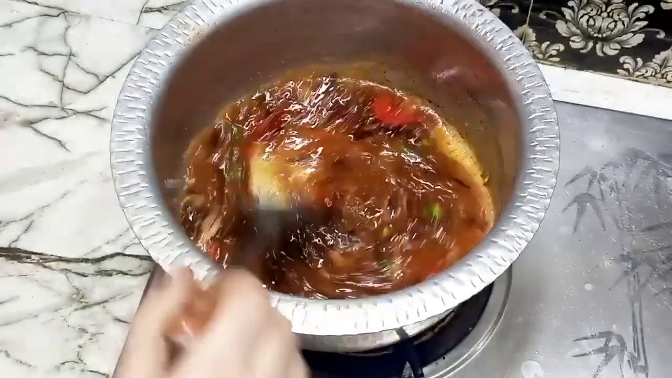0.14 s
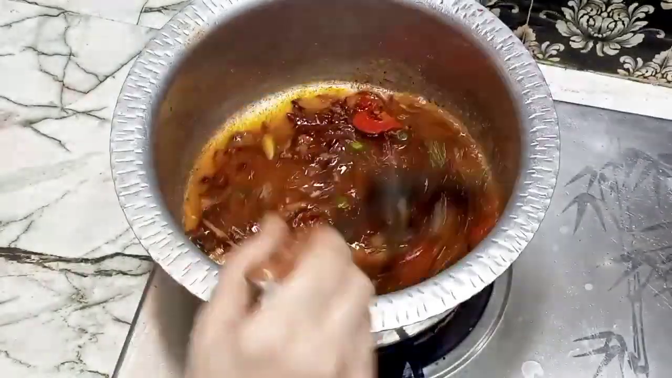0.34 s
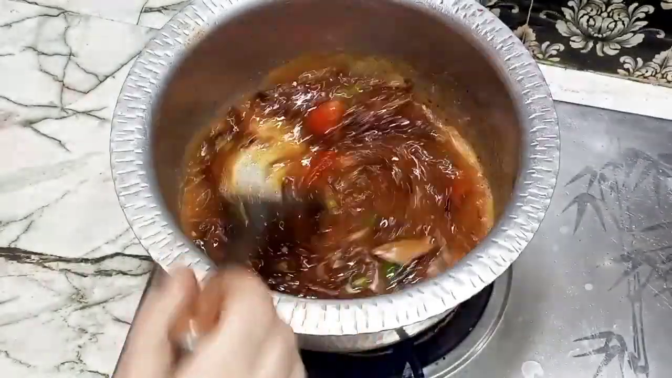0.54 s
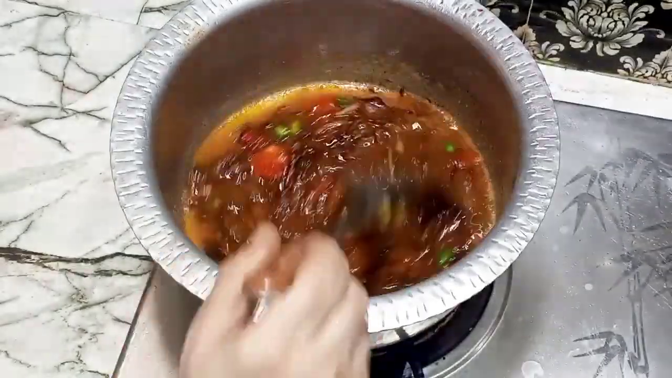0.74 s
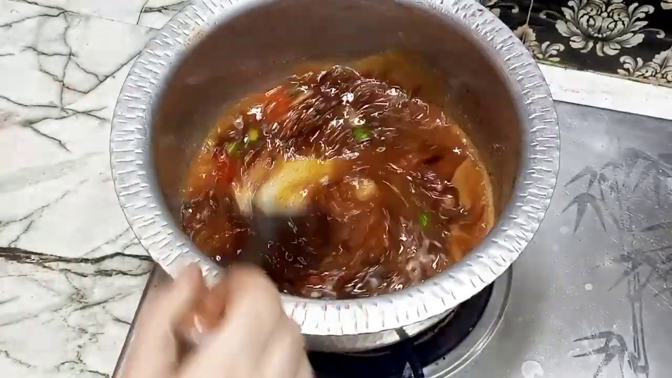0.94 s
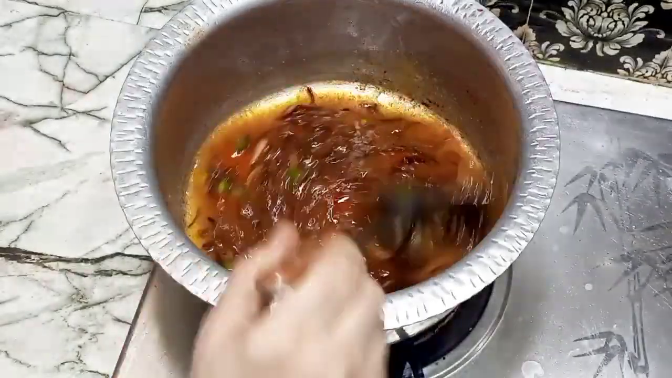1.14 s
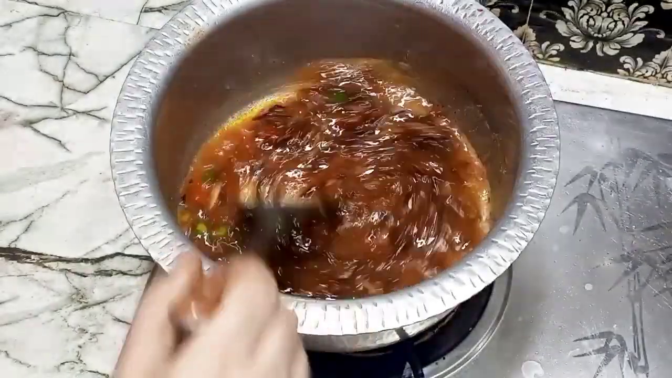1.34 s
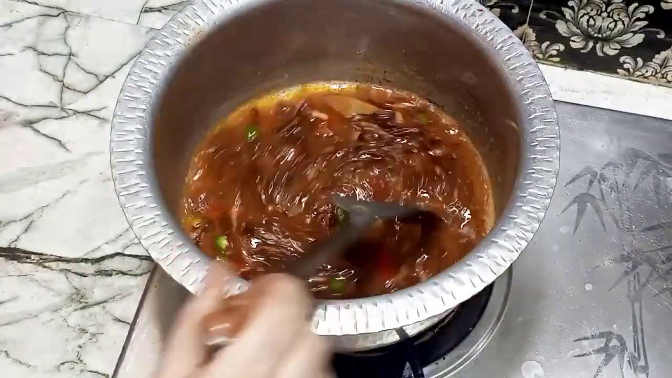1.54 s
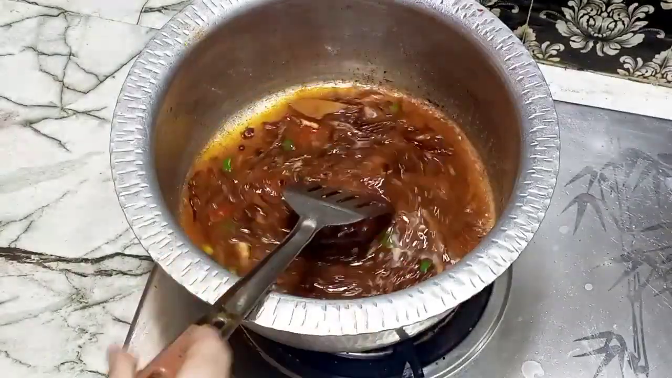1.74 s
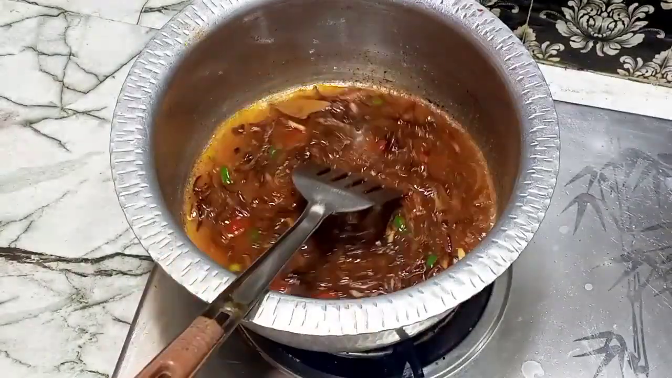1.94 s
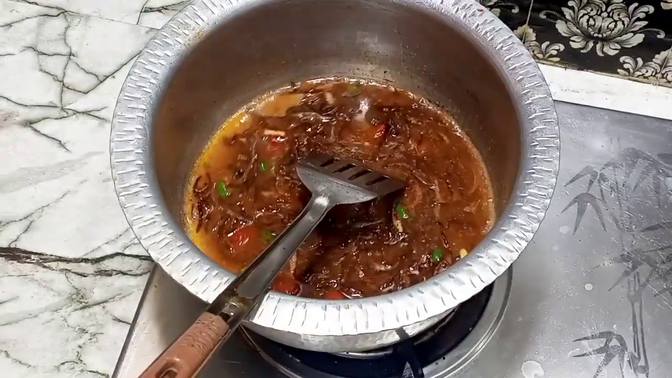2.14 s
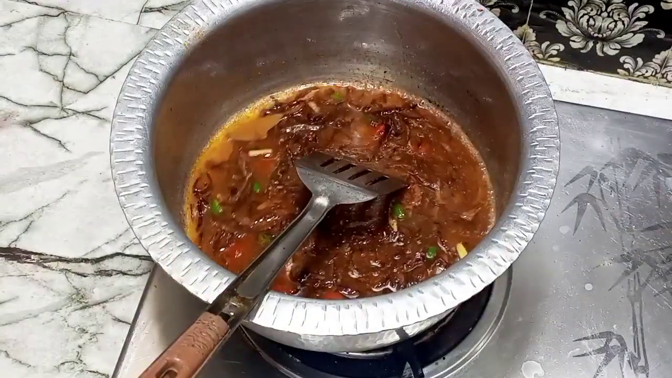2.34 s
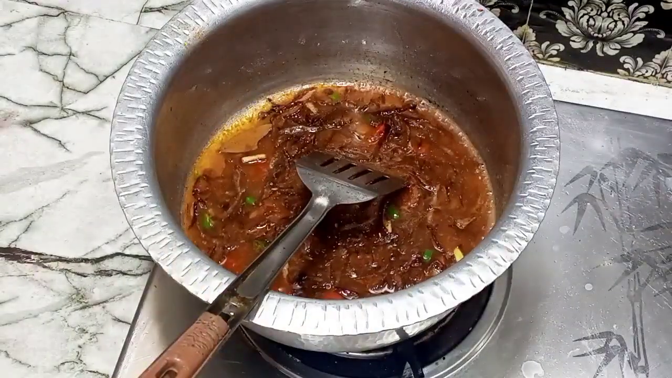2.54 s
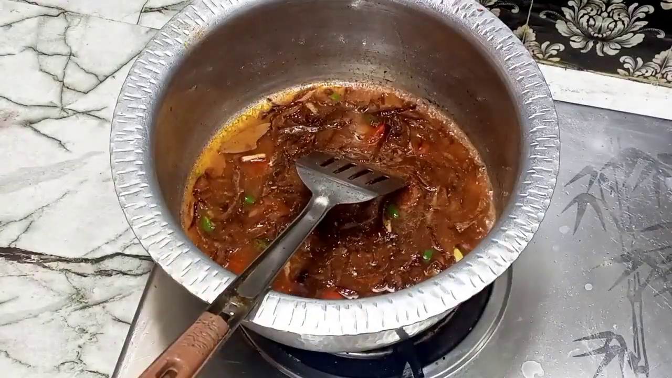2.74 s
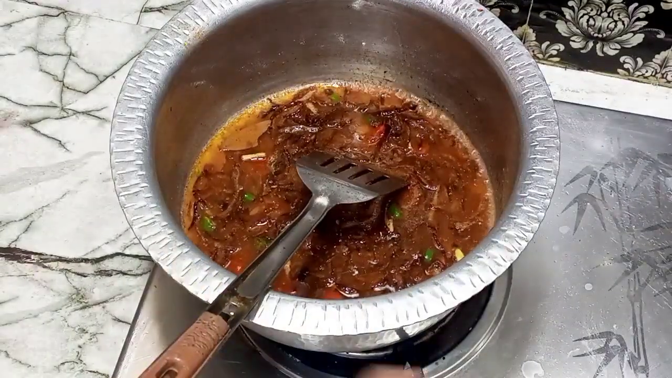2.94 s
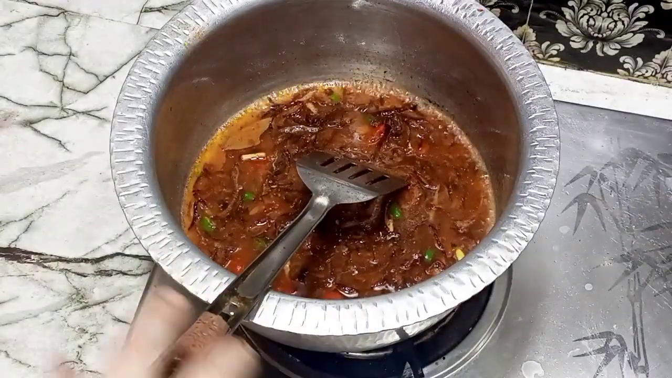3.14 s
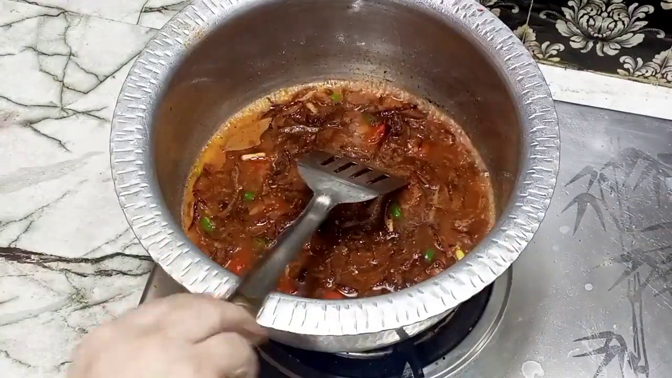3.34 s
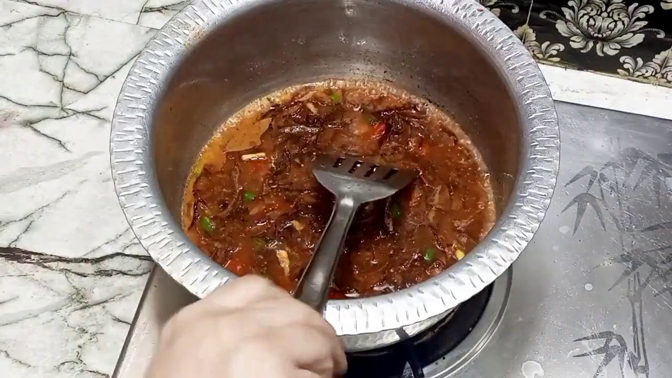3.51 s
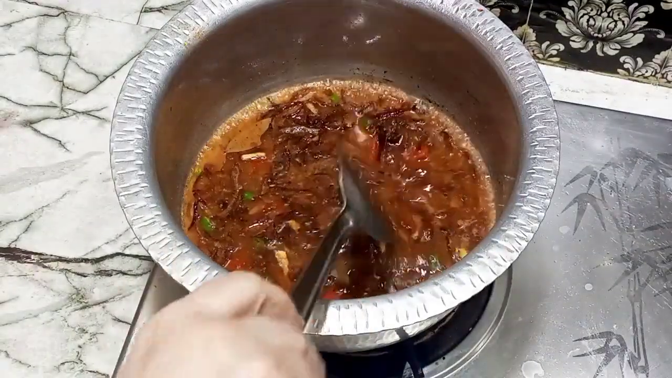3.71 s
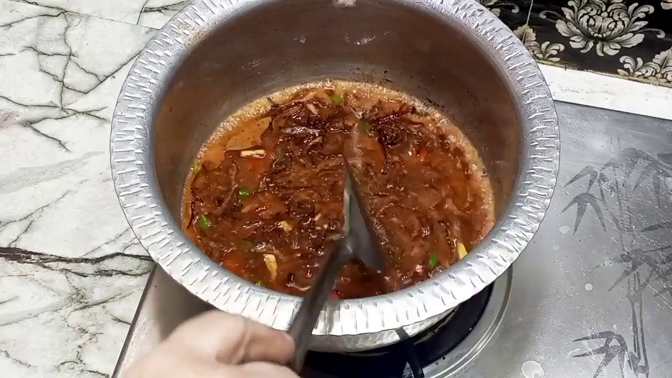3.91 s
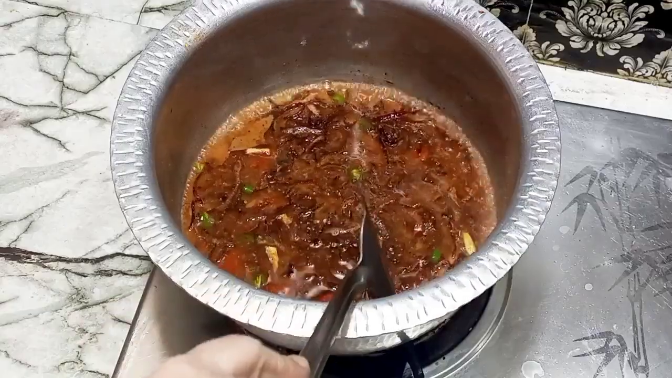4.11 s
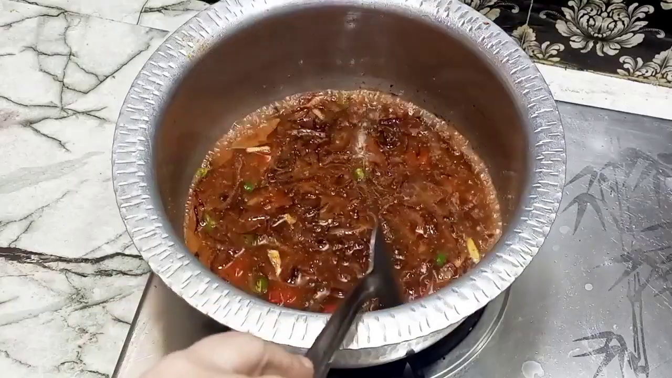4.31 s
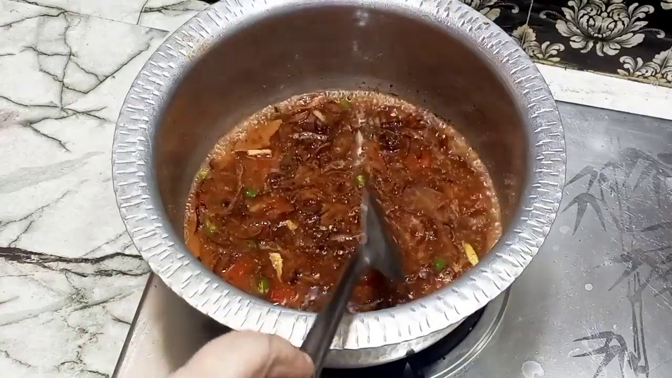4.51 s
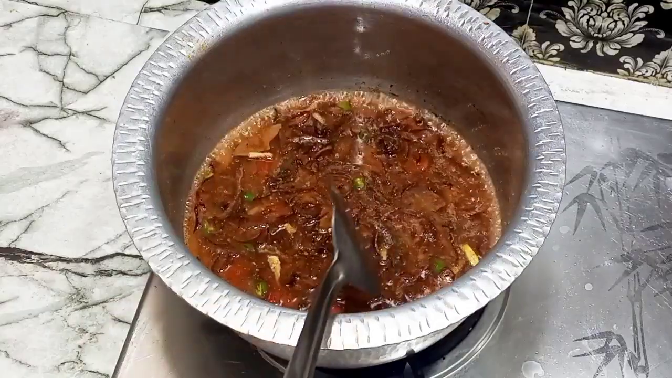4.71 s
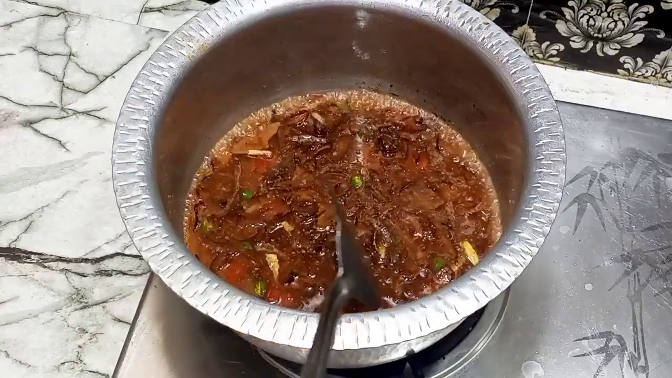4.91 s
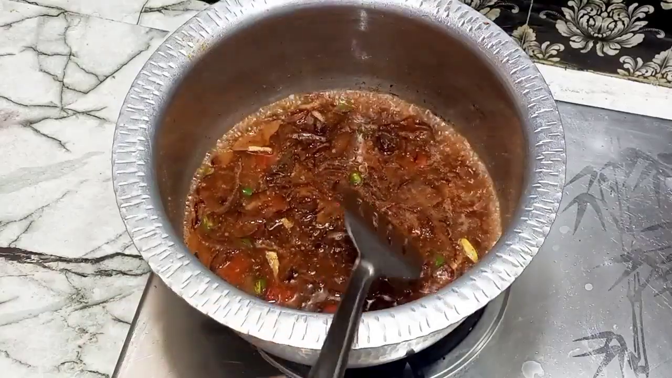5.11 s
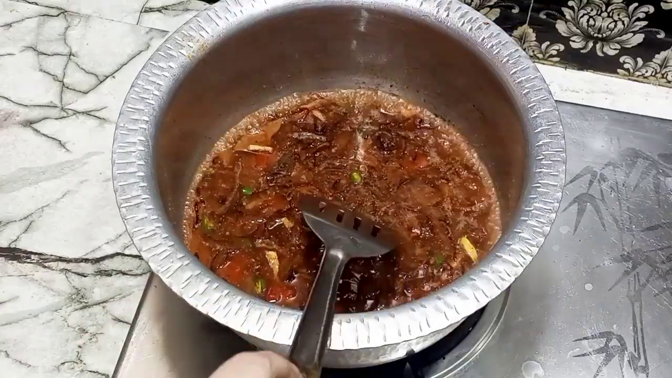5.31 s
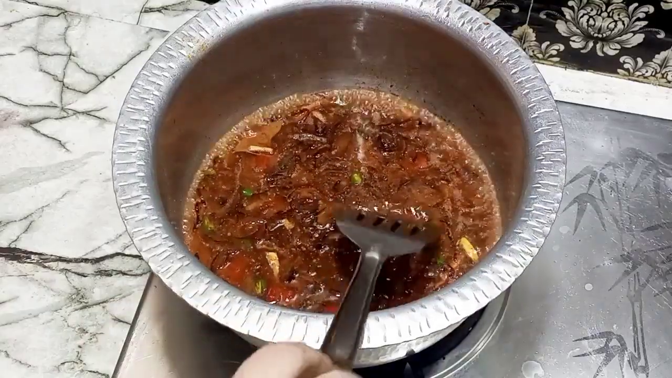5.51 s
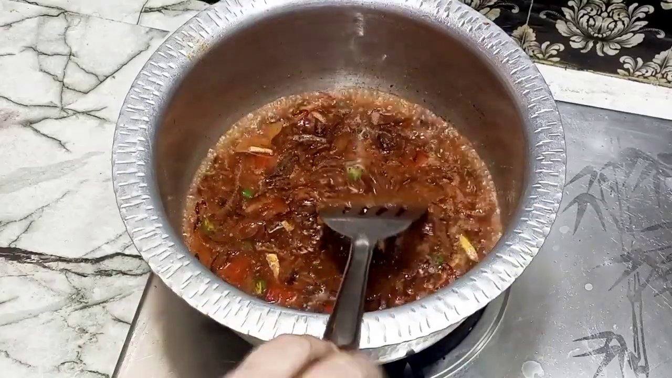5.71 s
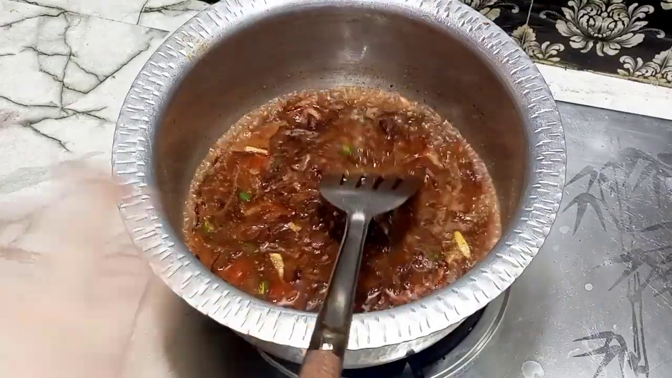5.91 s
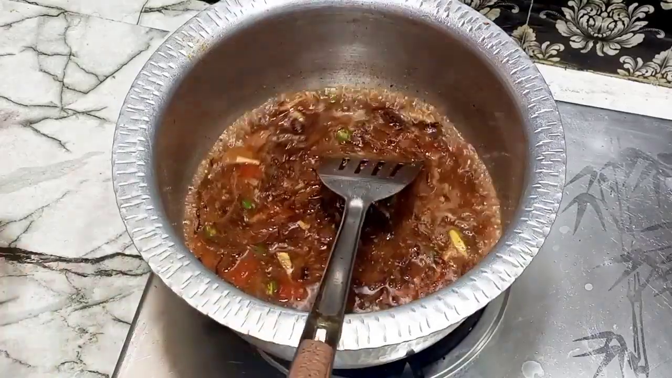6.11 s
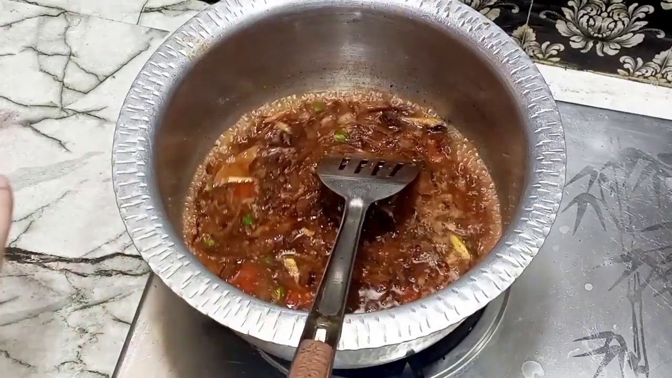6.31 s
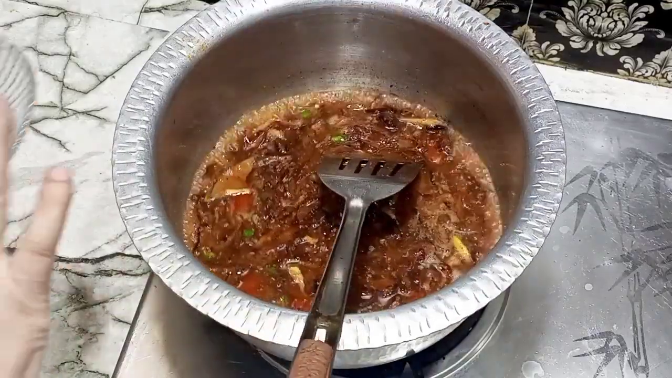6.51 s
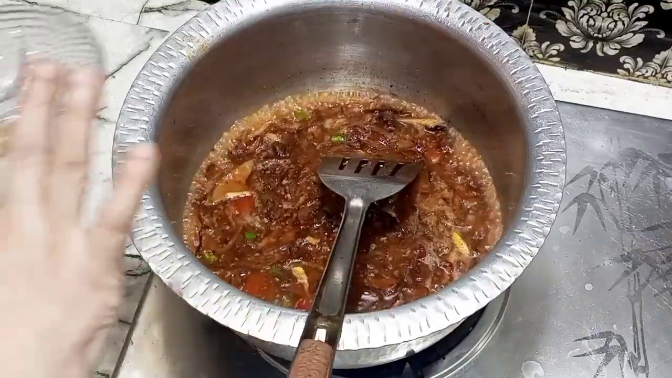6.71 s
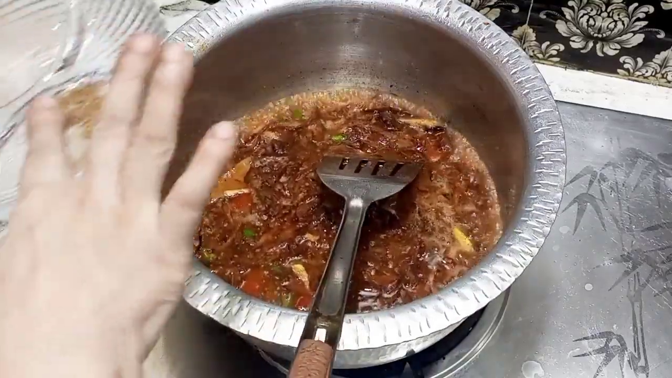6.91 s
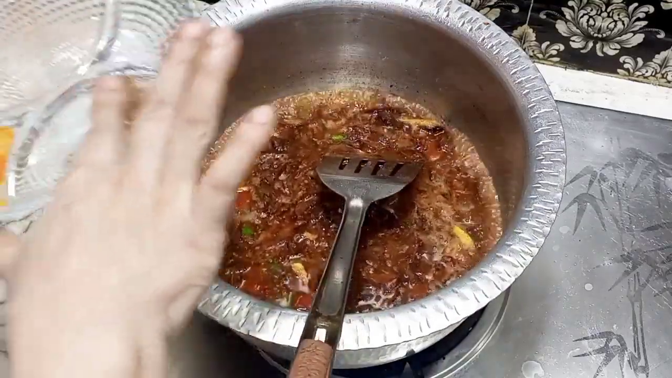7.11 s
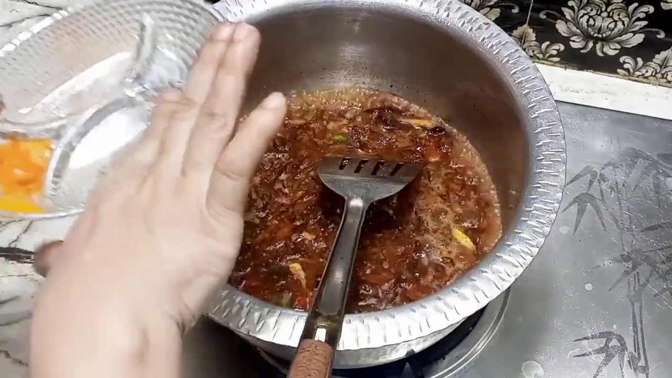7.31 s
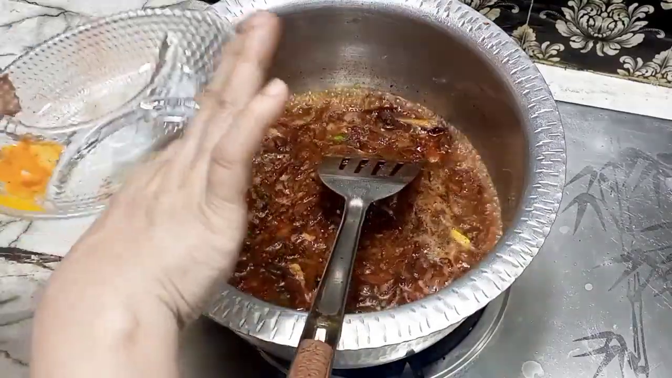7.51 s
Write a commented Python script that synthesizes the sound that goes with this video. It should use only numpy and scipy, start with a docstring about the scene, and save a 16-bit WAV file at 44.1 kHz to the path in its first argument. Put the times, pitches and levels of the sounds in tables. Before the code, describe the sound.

Oil and spices fizz and spit in an aluminium pot as a metal spatula scrapes the bottom in quick strokes. The spatula then clinks against the pot three times with pauses between, the first loudest, each ring dying quickly. The frying quietens to a gentle simmer. The close microphone also catches a faint low hum, soft rumbles and a barely audible gas whistle in the kitchen.

```python
"""In a kitchen, a steel spatula scrapes round an aluminium pot of frying spices, then clinks three
times against its wall. Friction drives the modes of the pot's bottom; each blow rings pot and blade
briefly, then is cut off quickly. Bursting bubbles make the oil fizz, water pockets spit, and the gas
jet whistles faintly. A low hum wavers and soft rumbles pass by a close microphone."""
import sys
import numpy as np
from scipy import signal
from scipy.fft import rfft, irfft, next_fast_len
from scipy.io import wavfile
from scipy.ndimage import uniform_filter1d, map_coordinates

SR = 44100
rng = np.random.default_rng(int(sys.argv[2]) if len(sys.argv) > 2 else 0)


def pcm_store(signal):
    """Save signal as 16-bit PCM."""
    levels = np.round(np.clip(np.atleast_2d(signal), -1, 1) * 32767)
    wavfile.write(sys.argv[1], SR, levels.astype(np.int16).T)


N = 333021

# The sizzle flares while stirred, then settles. Each row: time in seconds, fizz level in dB.
SIZZLE_LEVELS = [(0, -58.5), (.3, -58), (.6, -59.5), (.95, -61), (1.03, -52), (1.2, -57), (1.45, -59.5),
                 (1.58, -63), (2.05, -67.5), (2.5, -69), (3.6, -72), (4.1, -67), (5.2, -71.5), (6.2, -67.5),
                 (7.55, -70.5)]
# Brief dips of the background. Each row: centre in seconds, length in seconds, depth for the air in dB.
DIPS = [(2.034, .12, 4), (2.616, 0.14, 7.5)]
# Spectra of five noises. Each row: frequency in Hz, relative spectral density in dB.
FIZZ_SPECTRUM = [(3820, -21.5), (6500, -8), (7500, -15), (9190, -1), (10200, 0), (13500, -15),
                 (15100, -4.5), (16000, -6)]
WET_SPECTRUM = [(1180, -41), (2000, -5), (2420, -8.5), (2700, -10.5), (2980, 0), (3260, -2.5), (8000, 1.5),
                (10400, -34), (17600, -120)]
AIR_SPECTRUM = [(120, -33), (200, -8), (340, -12.5), (600, -8.5), (3500, -10.5), (4600, -37.5)]
THUD_SPECTRUM = [(40, -42.5), (60, -15.5), (80, -1.5), (100, 1.5), (125, -12), (200, -41)]
RUMBLE_SPECTRUM = [(110, -32), (160, 0.5), (260, -7.5), (400, -10), (650, -14.5), (1000, -43), (1400, -69)]
# Faint hollow tones in the air. Each row: frequency in Hz, width in Hz, gain of the added peak in dB.
AIR_RESONANCES = [(570, 120, 2), (1260, 83, 2.5), (1830, 72, 3.5), (2450, 72, 3)]
# Swells of the hum. Each row: centre in seconds, length in seconds, level in dB.
HUM_SWELLS = [(.15, 0.2, -65), (1.15, 0.16, -59), (2.25, .14, -65), (2.56, 0.079, -62.5),
              (3.02, 0.19, -67.5), (4.03, 0.24, -61.5), (4.28, 0.2, -60), (5.45, 0.22, -70.5),
              (6.13, 0.37, -58), (6.45, 0.12, -64.5), (7.04, 0.12, -68), (7.52, 0.13, -61.5)]
# Soft bumps. Each row: centre in seconds, length in seconds, thud level in dB, rumble over thud in dB.
BUMPS = [(.1, 0.24, -74, -7), (.5, 0.25, -71, -12.5), (1.17, 0.18, -67.5, -8), (1.42, 0.057, -85, 9.5),
         (1.87, .1, -62.5, -3), (2.52, 0.13, -85, 7), (2.82, 0.13, -68.5, -12), (4.02, 0.062, -63, 4),
         (4.28, 0.13, -65, 7.5), (4.201, 0.45, -64.5, -2), (3.52, 0.074, -101, -1),
         (5.61, 0.11, -75.5, 6.5)]
# Blade strokes. Each row: centre in seconds, length in seconds, deep level in dB, bright over deep in dB.
STROKES = [(0.033, 0.076, -64, 6), (0.101, 0.11, -61, -5.5), (0.211, .11, -67, 8.5),
           (.355, 0.067, -59.5, -8), (0.423, .071, -48, -3), (1.206, 0.093, -63, -4),
           (1.302, 0.074, -76, 13.5), (1.364, 0.058, -56.5, 3), (1.443, 0.13, -53, -4.5),
           (1.647, 0.059, -68.5, -13)]
# Modes of the wet bottom. Each row: frequency in Hz, nominal width in Hz, relative gain in dB.
BOTTOM_MODES = [(551, 47, 4), (830, 80, -10), (1170, 59, -4.5), (1802, 100, -13.5), (2312, 42, -17.5),
                (2580, 30, -15.5), (2880, 72, -22), (3227, 37, -19.5), (3430, 43, -20), (4250, 60, -20),
                (5000, 110, -35), (5570, 160, -18.5), (6070, 46, -14)]
# Brief single tones of the pot: squeaks while scraping, and one soft touch on the rim near 3.5 seconds.
# Each row: centre in seconds, length in seconds, frequency in Hz, level in dB.
POT_TONES = [(.085, 0.0061, 1220, -45.5), (0.1, 0.035, 1170, -55.5), (0.203, .017, 2220, -55.5),
             (.225, 0.054, 1170, -57.5), (0.241, .052, 5570, -58), (0.351, 0.048, 787, -54.5),
             (0.376, 0.035, 1170, -52.5), (0.411, 0.026, 4250, -51.5), (1.297, 0.15, 6070, -64),
             (1.47, .11, 530.5, -55), (1.559, 0.051, 757, -63.5), (1.722, 0.03, 882, -57.5),
             (.035, .038, 3430, -57), (.28, 0.051, 553, -63), (0.468, 0.077, 542, -71),
             (1.147, 0.073, 4250, -67.5), (1.728, 0.06, 1170, -68.5), (3.548, 0.12, 1322, -71),
             (3.523, 0.086, 535, -75), (3.52, .069, 3400, -69)]
# The larger spits. Each row: start in seconds, level before the high-pass in dB, frequency in Hz.
SPITS = [(0.3255, -39, 10300), (1.025, -34.5, 9800), (1.295, -38.5, 5990), (1.3375, -37, 5600),
         (1.3584, -46.5, 4300), (2.2774, -47.5, 9400), (2.3026, -42, 10570), (2.379, -42.5, 5840),
         (2.387, -41.5, 9600), (2.435, -47, 9250)]
# Blows, one to a spot. Each row: start in seconds, ring gain in dB, clatter gain in dB, bounce gap in
# seconds, loss per bounce in dB, seconds until the ring is cut off, cut-off rate in dB per second.
CLINKS = [(1.814, -20, -30, 0.016, 6, .11, 400), (4.0607, -27.5, -27.5, .012, 4.5, 0.2, 192),
          (5.5426, -35, -35, 0.0082, 6, .18, 300)]
# Modes of pot and blade. Each row: frequency in Hz, seconds to decay by 60 dB, then the relative level
# in dB for each of the three spots struck.
POT_MODES = [(507, 0.2, -23, 1, -6), (547, 0.25, -21, -7, -11), (631, 0.2, -27, -2, -10),
             (880, 0.15, -32, -16, -18), (1321, 0.24, -26, -2, -14), (1639, 0.14, -61, -25, -11),
             (1784, 0.15, -47, -17, -9), (1841, 0.9, -33, -31, -18), (1856, 0.16, -30, -9, -14),
             (2139, 0.21, -22, -4, -21), (2407, 0.55, -30, -21, -27), (2562, 0.18, -27, -15, -21),
             (2780, 0.24, -39, -11, -23), (2914, 0.2, -12, -1, -15), (2986, 0.2, -13, -7, -24),
             (3398, 0.25, -3, -4, -12), (3440, 0.18, -24, -3, -21), (3684, 0.17, -21, -6, -14),
             (3904, 0.19, -23, -7, -16), (4243, 0.5, -35, -18, -28), (4368, 0.18, -39, -15, -10),
             (4756, 0.4, -34, -28, -15), (4896, 0.22, -53, -12, -9), (5271, 0.19, -37, -34, -4)]
BLADE_MODES = [(5579, 0.15, -19, -16, 0), (5640, 0.14, -20, -32, -1), (5815, 0.16, -13, -11, -5),
               (5881, 0.18, -17, -17, -5), (6337, 0.13, -42, -5, -20), (6539, 0.14, -25, -3, -15),
               (6683, 0.16, -24, -13, -12), (6847, 0.15, -26, -8, -13), (7271, 0.14, -20, -20, -6),
               (7681, 0.11, -25, -12, -11), (8808, 0.11, -32, -15, -11), (9808, 0.11, -22, -12, -3),
               (10205, 0.11, -30, -29, -2), (10693, 0.11, -51, -19, -5)]
# Weak modes that blur into clatter. Each row: frequency in Hz, then relative density in dB at each spot.
CLATTER_SPECTRA = [(162, -46, -35.5, -22), (215, -21.5, -28.5, 1), (370, -58, -15.5, -20),
                   (596, -26.5, -3, 1.5), (1079, -22.5, -17.5, -12.5), (1740, -39.5, -11, -2),
                   (2300, -26, -16.5, -18), (3400, -0.5, -11.5, -13), (4670, -39, -26.5, 0),
                   (5930, -6, -9.5, 7), (7650, -25.5, -16, -5.5), (10060, -17.5, -13.5, -0.5),
                   (13600, -57.5, -26.5, -12.5), (15500, -53.5, -20, -17.5)]
# Swells of the gas jet's whistle. Each row: centre in seconds, length in seconds, level in dB.
WHISTLE_SWELLS = [(2.54, 0.042, -81), (4.9, 7.7, -79), (6.35, 0.28, -75)]

SIMMER_DB, TOP_HZ = -70, 15800  # fizz level at a simmer; band limit


def amp(db):
    """Amplitude ratio of a level in dB."""
    return 10 ** (np.asarray(db) / 20)


def unit(x):
    """Normalisation to an rms of 1."""
    return x / np.sqrt(np.mean(x ** 2) + 1e-20)


def wobble(rate, size=N):
    """Smooth random modulation: a spline through rate knots a second."""
    knots = rng.standard_normal(int(size * rate / SR) + 4)
    return map_coordinates(knots, [np.arange(size) * rate / SR])


def swells(rows, rest_db):
    """Amplitude envelope: flat-topped swells above a resting level."""
    t = np.arange(0, N, 64) / SR
    gain = amp(rest_db) + sum(amp(db) * np.exp(-(2 * (t - s) / length) ** 4) for s, length, db in rows)
    return np.interp(np.arange(N) / SR, t, gain)


def filtered(x, response):
    """Linear filtering: the spectrum of x times a frequency response."""
    size = next_fast_len(len(x) + 8192)
    return irfft(rfft(x, size) * response(np.fft.rfftfreq(size, 1 / SR)), size)[:len(x)]


def colour(points):
    """Frequency response through (Hz, dB) points on a log axis, closed beyond them."""
    f, db = np.transpose(points)
    return lambda hz: amp(np.interp(np.log(hz + 1), np.log(f + 1), db, -120, -120))


def peak(centre_hz, width_hz, order=1):
    """Band-pass response of a damped resonator, or of several in cascade."""
    return lambda f: (1j * f * width_hz / (centre_hz ** 2 - f * f + 1j * f * width_hz)) ** order


def noise(response, size=N):
    """Gaussian noise shaped by a frequency response, at an rms of 1."""
    return unit(filtered(rng.standard_normal(size), response))


def patchy(spread_db, bins, frames):
    """White noise, amplitude-modulated in patches of frequency and time."""
    spectra = signal.stft(rng.standard_normal(N), nperseg=512)[2]
    field = uniform_filter1d(rng.standard_normal(spectra.shape), bins, axis=0)
    field = uniform_filter1d(field, frames, axis=1)
    return signal.istft(spectra * amp(spread_db * unit(field)), nperseg=512)[1][:N]


def frying():
    """Countless bursting bubbles add incoherently to a fizz; a wet hiss and the air follow its level."""
    t = np.arange(N) / SR
    fizz_db = np.interp(t, *np.transpose(SIZZLE_LEVELS))
    flare_db = fizz_db - SIMMER_DB
    dip_db = -sum(db * np.exp(-(2 * (t - s) / length) ** 4) for s, length, db in DIPS)
    ticks = rng.random(N) < 300 / SR  # about 300 a second
    ticks = ticks * amp(rng.normal(0, 2.5, N)) * rng.choice([-1, 1], N)
    bubbles = patchy(0.59, bins=6, frames=8) + amp(-5.5) * unit(ticks)
    fizz = unit(filtered(bubbles, colour(FIZZ_SPECTRUM)))
    fizz *= amp(fizz_db + 0.25 * dip_db + 1.2 * wobble(30))
    hiss = unit(filtered(patchy(2.5, bins=4, frames=8), colour(WET_SPECTRUM)))
    hiss *= amp(-74.5 + 0.87 * flare_db + 0.61 * dip_db)
    air = amp(-79 + 0.57 * flare_db + dip_db) * kitchen_air()
    return fizz + hiss + air


def kitchen_air():
    """Narrow resonances give broadband noise a faintly hollow colour."""
    hollow = lambda f: 1 + sum(amp(db) * abs(peak(hz, width)(f)) ** 2 for hz, width, db in AIR_RESONANCES)
    return unit(filtered(patchy(4.7, bins=2, frames=20), lambda f: colour(AIR_SPECTRUM)(f) * hollow(f)))


def hum():
    """A low tone wavers by random frequency and amplitude modulation, over a narrow-band drone."""
    hz = 131 + 5 * wobble(14)
    tone = np.sqrt(2) * np.sin(2 * np.pi * np.cumsum(hz) / SR) * amp(1.8 * wobble(13))
    drone = amp(-82 + 5.6 * wobble(5.1)) * noise(peak(130, 25))
    return drone + swells(HUM_SWELLS, rest_db=-100) * tone


def bumps():
    """Two low noise bands, amplitude-modulated together: a dull thud and a rumble above it."""
    thud = unit(amp(2 * wobble(7.2)) * noise(colour(THUD_SPECTRUM)))
    rumble = unit(amp(2 * wobble(30)) * noise(colour(RUMBLE_SPECTRUM)))
    thud_gain = swells([row[:3] for row in BUMPS], rest_db=-86.5)
    rumble_gain = swells([(s, length, db + over) for s, length, db, over in BUMPS], rest_db=-93.5)
    return thud_gain * thud + rumble_gain * rumble


def scrape():
    """Forced vibration: friction drives the bottom's modes, each swelling and fading as the blade moves."""
    size = 2 * SR
    grit = rng.standard_normal(size) * amp(1.8 * wobble(60, size))
    deep, bright = np.zeros((2, size))
    for hz, width, db in BOTTOM_MODES:
        band = bright if hz > 1450 else deep
        band += amp(db + 4.5 * wobble(18, size)) * filtered(grit, peak(hz, 1.7 * width, order=2))
    # a broad rasp lies under each group of modes
    deep = unit(deep) + amp(-7) * unit(filtered(grit, peak(960, 900, order=2)))
    bright = unit(bright) + amp(-2.5) * unit(filtered(grit, peak(2180, 3500, order=2)))
    deep_gain = swells([row[:3] for row in STROKES], rest_db=-120)
    bright_gain = swells([(s, length, db + over) for s, length, db, over in STROKES], rest_db=-120)
    return np.pad(deep_gain[:size] * deep + bright_gain[:size] * bright, (0, N - size))


def pot_tones():
    """Single modes sound briefly, roughened by a random walk of phase: squeaks and one soft touch."""
    lead = SR // 5
    out, t = np.zeros(N + SR), np.arange(-lead, lead) / SR
    for s, length, hz, db in POT_TONES:
        drift = 0.052 * np.cumsum(rng.standard_normal(len(t)))
        tone = np.sqrt(2) * np.sin(2 * np.pi * hz * t + drift)
        out[round(s * SR):][:len(t)] += amp(db) * tone * np.exp(-(2 * t / length) ** 4)
    return out[lead:][:N]


def spits():
    """Impulsive excitation: water pockets pop in the oil, each a damped click and a bright spray."""
    out, t = np.zeros(N), np.arange(SR // 50) / SR
    small_spits = [(2.8 * when, -55 + 4 * strength, 9300 * (0.7 + 0.4 * pitch))
                   for when, strength, pitch in rng.random((6, 3))]
    for s, db, hz in SPITS + small_spits:
        click = np.sin(2 * np.pi * hz * t) * amp(-60 * t / 0.0031)
        spray = 0.25 * np.diff(rng.standard_normal(len(t) + 1)) * amp(-60 * t / 0.0036)
        out[round(s * SR):][:len(t)] += amp(db) * (click + spray)
    return filtered(out, lambda f: 1 / (1 + (4000 / (f + 1)) ** 4))  # high-pass


def clinks():
    """Damped free vibration: each blow and its bounces ring pot and blade, over a crack and a clatter."""
    out, t = np.zeros(N), np.arange(SR // 2) / SR
    hz, t60, *spot_levels = np.transpose(POT_MODES + BLADE_MODES)[..., None]
    blur_hz, *spot_blurs = np.transpose(CLATTER_SPECTRA)
    for blow, mode_db, blur_db in zip(CLINKS, spot_levels, spot_blurs):
        start, ring_db, clatter_db, gap, loss_db, free_s, cut_rate = blow
        # each mode's phase wanders at random, more so for high modes
        unrest = 0.012 * hz / 3000 * np.cumsum(rng.standard_normal((len(hz), len(t))), axis=1)
        tones = np.sin(2 * np.pi * (hz * t + rng.random(hz.shape)) + unrest)
        tones *= amp([2.5 * wobble(30, len(t)) for _ in hz])
        blur = noise(colour(np.transpose([blur_hz, blur_db])), len(t))
        treble = filtered(blur, lambda f: 1 / (1 + (7500 / (f + 1)) ** 4))
        energy, rattle = 0, 0
        for bounce in range(4):
            age = np.maximum(t - bounce * gap, 0)
            onset = amp(-loss_db * bounce) * (1 - np.exp(-age / 0.0007))
            energy += (onset * amp(mode_db - 60 * age / t60)) ** 2  # each contact tops up every mode
            clatter = (blur - treble) * amp(-60 * age / 0.19) + treble * amp(-60 * age / 0.11)
            crack = blur * amp(-3 - 60 * age / 0.023)
            rattle += onset * (clatter + crack)
        cut_s = free_s * np.maximum(t60 / 0.59, 1)  # long-ringing modes are cut later
        fade = amp(-cut_rate * np.maximum(t - cut_s, 0))
        ring = np.sum(np.sqrt(energy) * tones * fade, axis=0)
        rattle *= amp(-cut_rate * np.maximum(t - free_s, 0))
        out[round(start * SR):][:len(t)] += amp(ring_db) * ring + amp(clatter_db) * rattle
    return out


def gas_whistle():
    """Narrow-band flow noise: the gas jet sings and sputters."""
    sputter = amp(3 * wobble(12))
    return swells(WHISTLE_SWELLS, rest_db=-100) * sputter * noise(peak(6020, 170, order=2))


def scene():
    """Superposition: all sources add at one microphone."""
    return (clinks() + scrape() + pot_tones() + frying() + spits() + gas_whistle() + hum() + bumps())[None]


def record(dry):
    """An ideal low-pass filter removes everything above the band limit."""
    return filtered(dry[0], lambda hz: hz < TOP_HZ)[None]


dry = scene()
out = record(dry)
pcm_store(out)
```